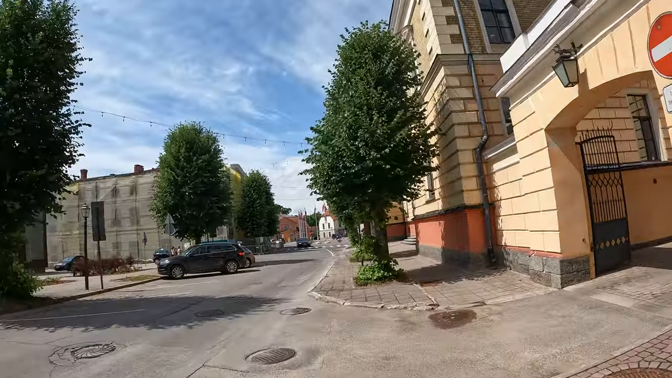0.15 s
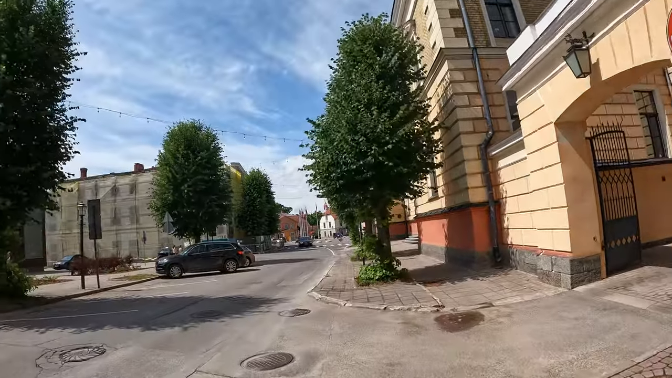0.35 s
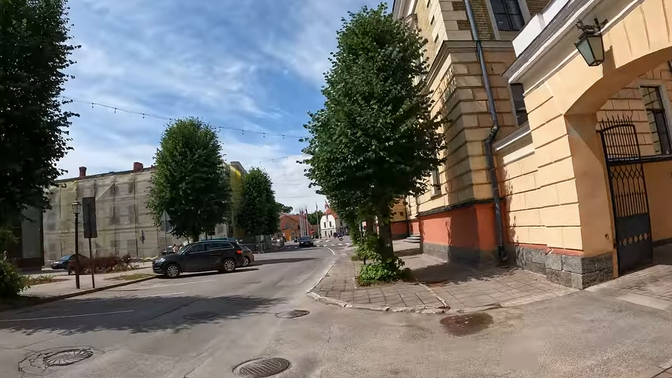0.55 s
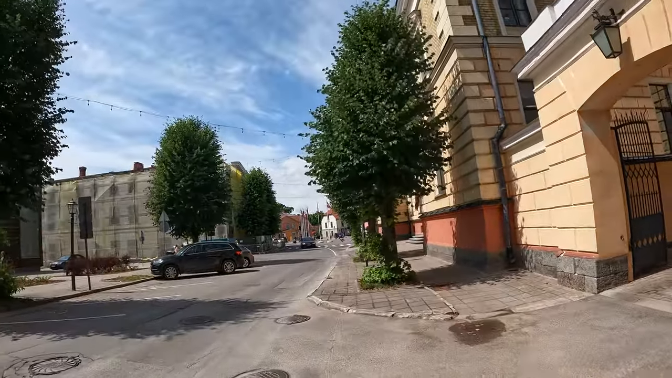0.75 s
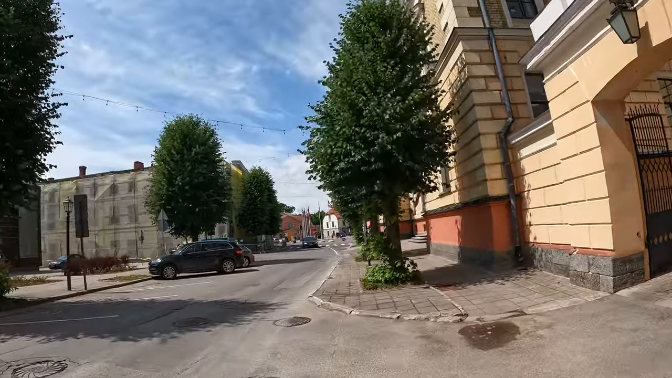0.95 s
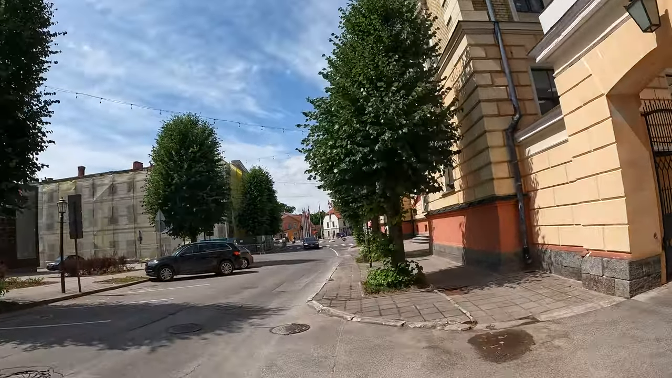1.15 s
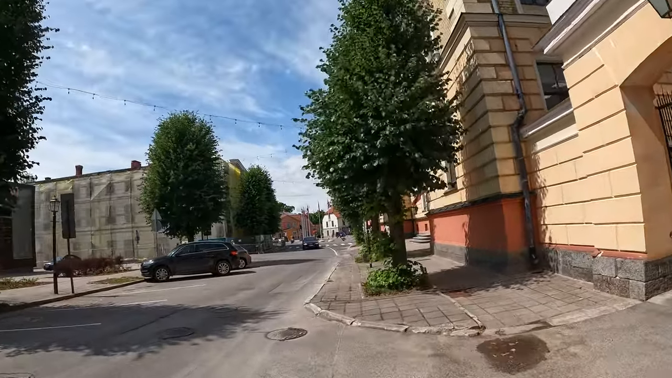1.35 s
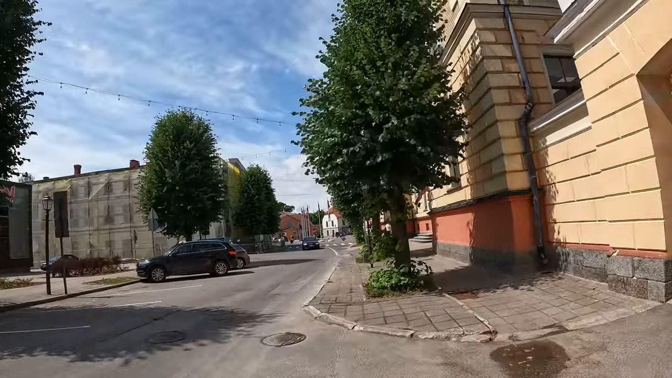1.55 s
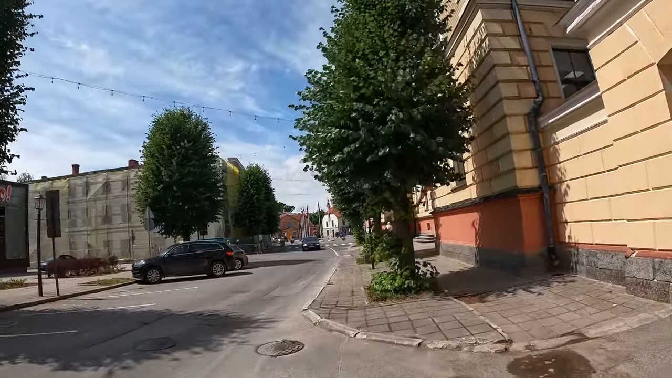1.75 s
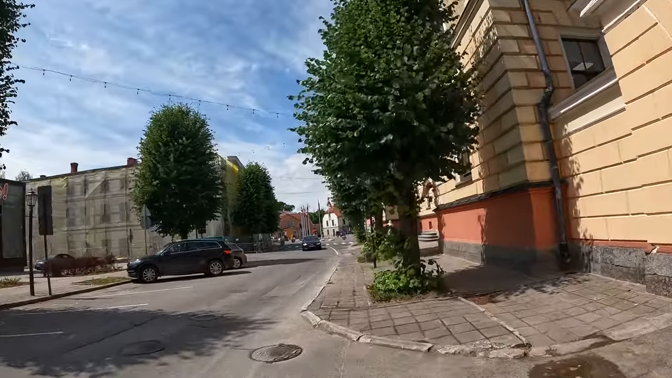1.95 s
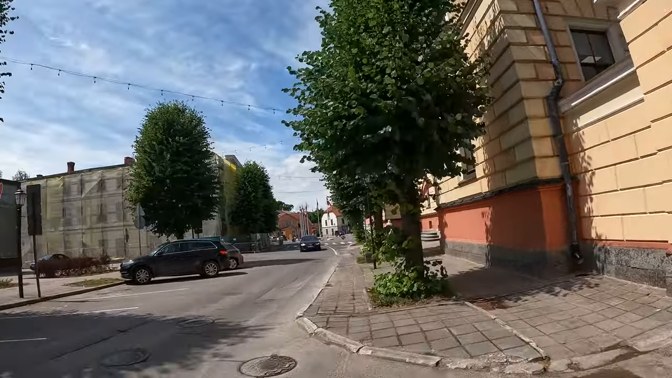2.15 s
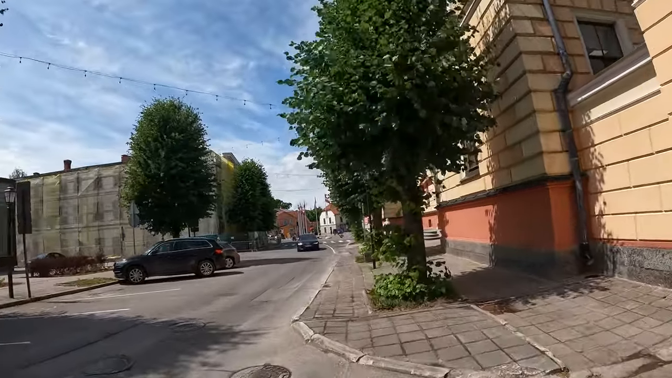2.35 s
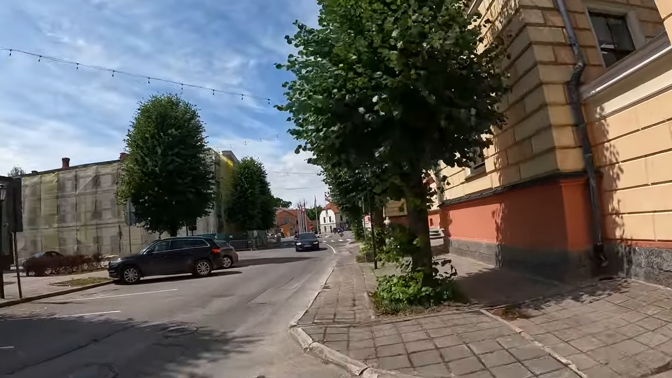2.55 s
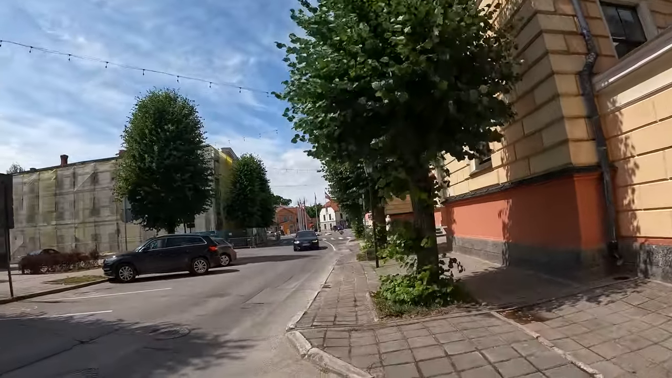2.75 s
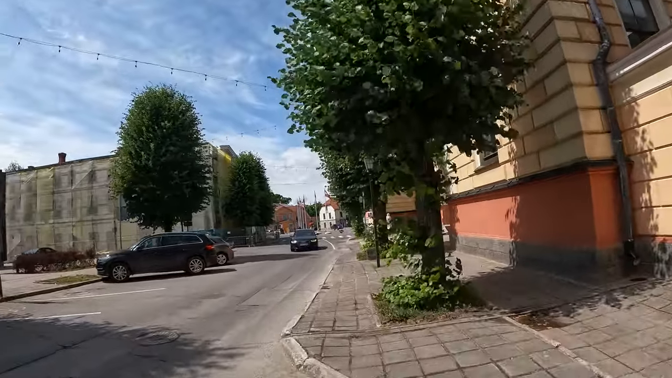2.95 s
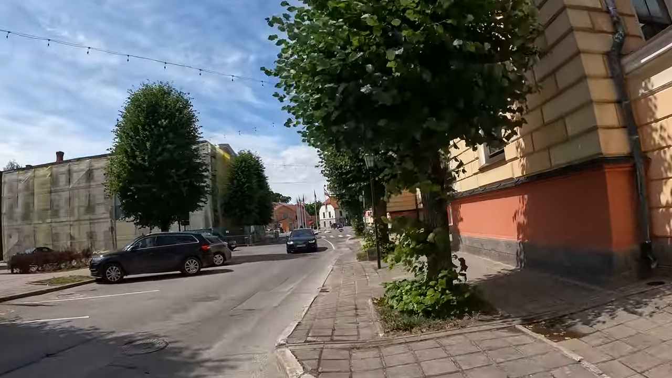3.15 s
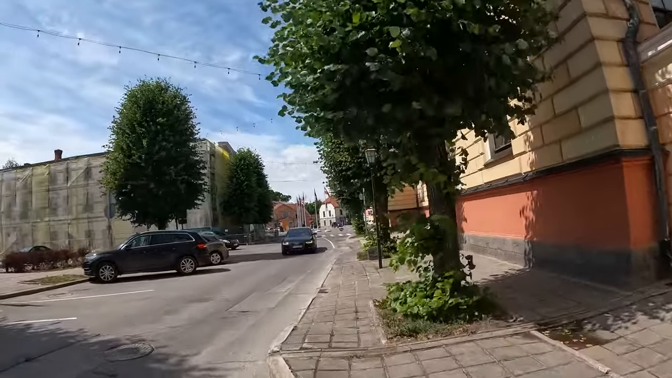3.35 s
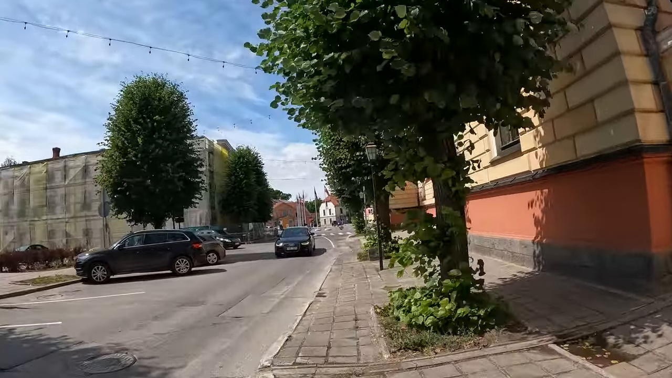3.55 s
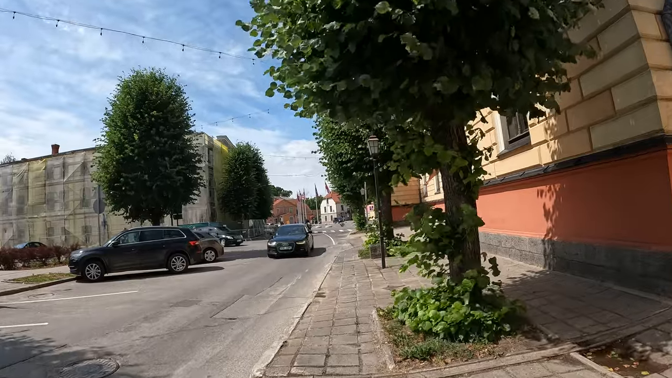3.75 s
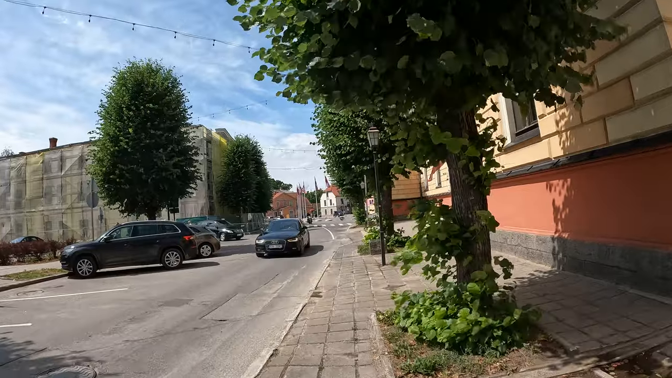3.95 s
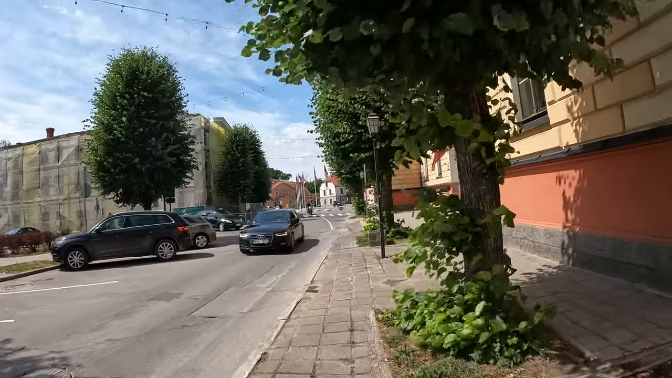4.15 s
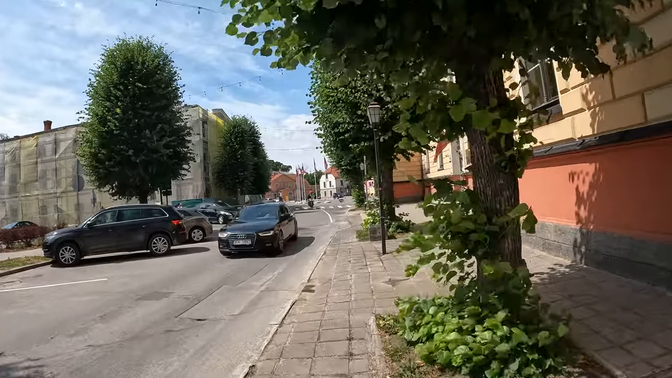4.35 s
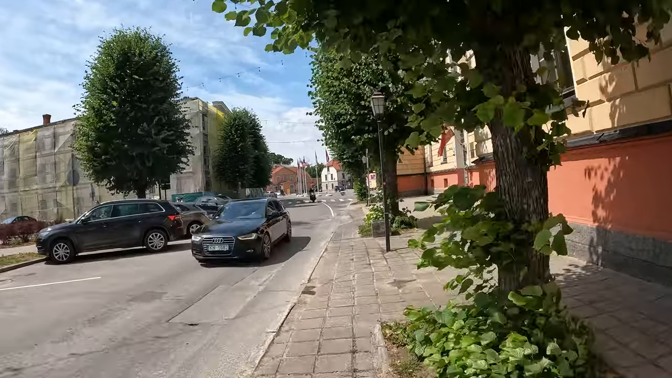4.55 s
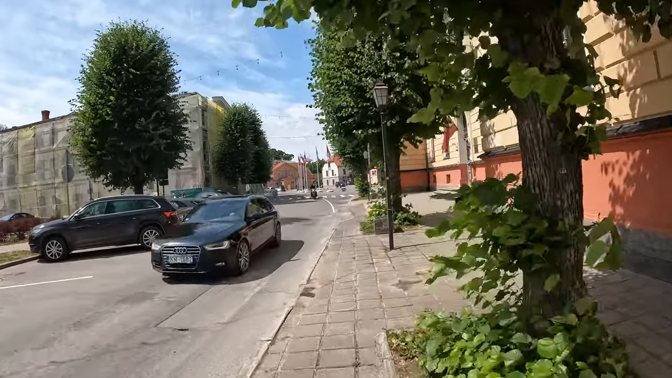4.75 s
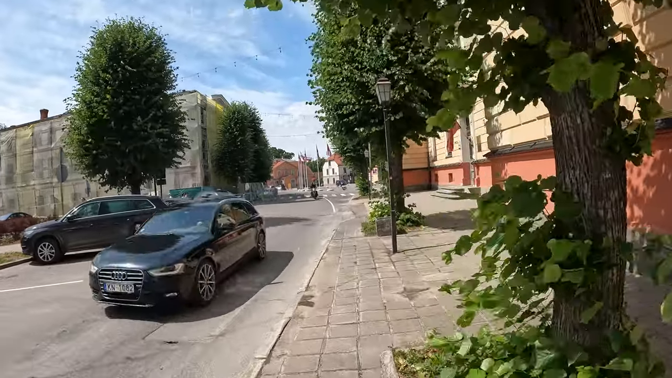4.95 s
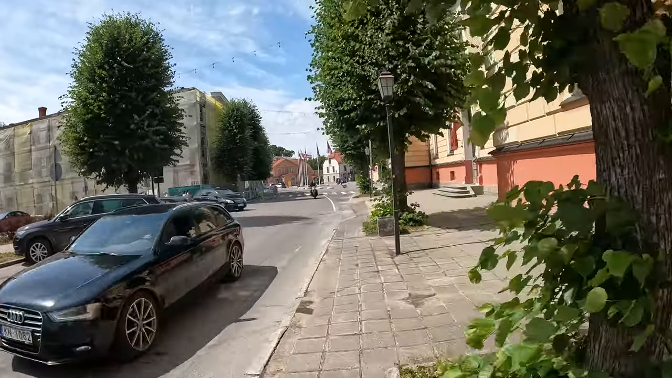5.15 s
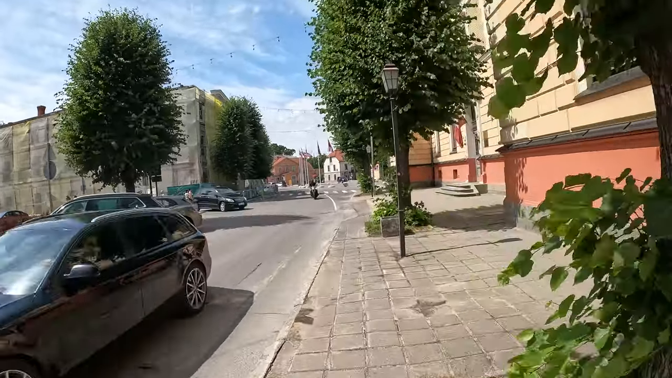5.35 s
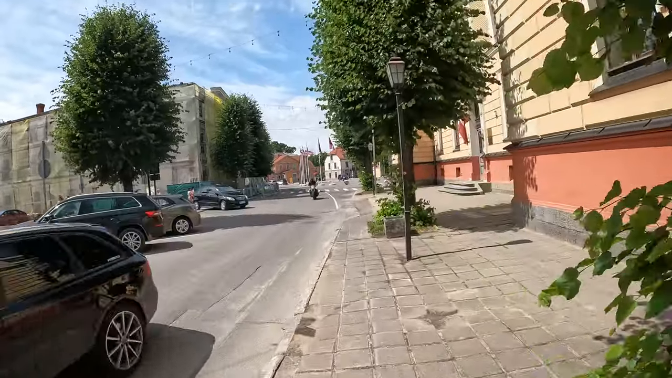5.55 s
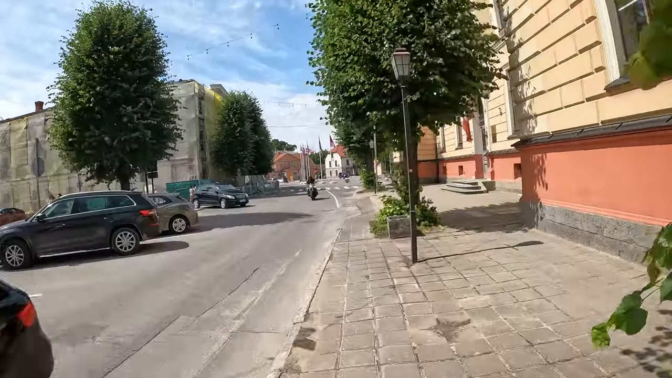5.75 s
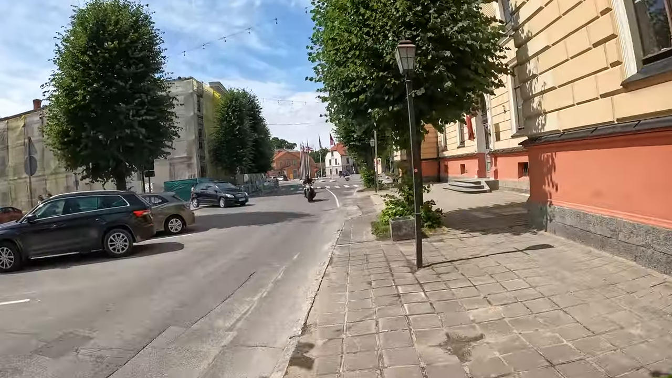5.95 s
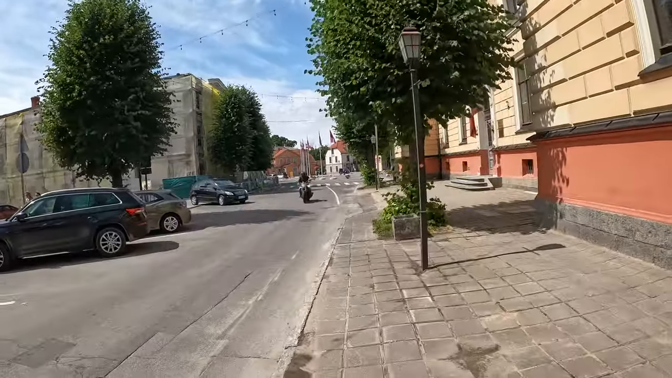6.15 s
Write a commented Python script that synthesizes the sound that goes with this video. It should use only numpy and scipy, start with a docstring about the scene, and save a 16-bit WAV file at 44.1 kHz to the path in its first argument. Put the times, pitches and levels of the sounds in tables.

```python
"""A motorcycle drones, eases off, accelerates and shifts up in a town street, while a car rolls up and past.
The motorcycle is a stack of exhaust harmonics and block growl locked to one engine, plus a gliding gear whirr.
The car is coloured tyre noise that swells to a roar as its distance shrinks, with a drive-train whine.
Wind lumps on the microphone as shaped noise and pressure slaps; shoes scuff gritty paving with noise bursts.
Dull knocks are short noisy resonances, and faint unsteady hums come from further down the street."""
import sys
import numpy as np
from scipy import signal
from scipy.fft import rfft, irfft, next_fast_len
from scipy.io import wavfile

SR = 44100
rng = np.random.default_rng(int(sys.argv[2]) if len(sys.argv) > 2 else 0)


def persist_wave(psi):
    """Save psi, clipped to +-1, as 16-bit WAV."""
    counts = np.round(np.clip(psi, -1, 1) * 32767).astype(np.int16)
    wavfile.write(sys.argv[1], SR, np.atleast_2d(counts).T)


N = 273856
TIME = np.arange(N) / SR   # s

# Motorcycle pulling, easing off, accelerating and shifting up. Each row: time in seconds, engine cycles per second.
ENGINE_SPEED = [(0,30.4),(.45,30.4),(.7,32.1),(1.1,33.2),(1.35,33.2),(1.93,31.5),(2.45,29.5),(3.17,28.3),(3.68,31.3),(4.45,34.5),(4.98,38.3),(5.2,41.9),(5.32,41.5),(5.47,35.6),(5.62,38.1),(5.73,38.5),(6.21,34.4)]
# Exhaust loudness as the throttle opens and closes. Each row: time in seconds, level in dB.
THROTTLE_LEVEL = [(0,-36.5),(.17,-33),(.5,-34),(.75,-32),(1.08,-28.5),(1.3,-31),(1.65,-34.5),(1.92,-30),(2.9,-26),(3.17,-46),(3.45,-23.5),(3.75,-32.5),(4.45,-21),(4.75,-30),(4.97,-23),(5.3,-27.5),(5.75,-29),(6.05,-22)]
# Main exhaust harmonics. Each row: multiple of the cycle rate, dB on the throttle level before the car
# has gone by, the same after.
MAIN_HARMONICS = [(3, -14.5, 2), (4, -5.5, 1), (5, -1.5, -4)]
# Weaker exhaust harmonics. Each row: multiple of the cycle rate, dB against the main ones together.
WEAK_HARMONICS = [(1,-16.5),(2,-20),(6,-25.5),(7,-24.5),(8,-25.5)]
# Echoes between house fronts briefly cancel or lift one harmonic. Each row: multiple of the cycle rate,
# time in seconds, change in dB, width in seconds.
ECHO_FADES = [(1,5.87,8.5,0.28),(3,.2,10,0.18),(3,1.937,18.5,0.12),(3,3.4,4,0.26),(3,4.65,-5,0.22),(3,5.6,8,0.059),(4,5.62,0,.07),(4,0.19,5.5,0.039),(4,0.76,-6.5,0.28),(4,1.9,-13,0.041),(4,3.59,-10,0.11),(4,5.05,-15,.1),(4,4.78,8,0.05),(4,5.88,-10,0.049),(5,0.49,-16,0.056),(5,0.79,2,.2),(5,1.5,-5,0.17),(5,1.925,5,0.052),(5,2.8,7.5,0.037),(5,5.34,5,0.046),(5,7.8,5,0.044)]
# Growl of the engine block. Each row: multiple of the cycle rate, relative dB before the car has gone by,
# relative dB after.
GROWL_HARMONICS = [(8,0,-9),(9,-3,1.5),(10,-9,0.5),(11,-11,-3.5),(12,-4.5,-4.5),(13,-4.5,-3.5),(14,-7,-8),(15,-8,0),(16,0,-6),(17,-1.5,-12),(18,-6.5,-5.5),(19,-8.5,-6),(21,-3.5,-9),(23,-4,-5.5),(25,-3,-6),(27,-10,-3)]
# Growl swelling as the engine is revved. Each row: time in seconds, level in dB.
GROWL_LEVEL = [(0,-59.5),(3.4,-55),(4.35,-49),(4.95,-41),(5.25,-43.5),(5.5,-49),(6.21,-48)]
# Gear whirr, before the split into core and band. Each row: time in seconds, level in dB.
WHIRR_LEVEL = [(0,-78),(1.3,-65),(3.05,-63.5),(3.35,-54),(3.65,-50),(4.3,-49.5),(4.75,-54),(5.03,-47.5),(5.28,-48),(5.38,-53),(5.48,-51),(5.65,-48.5),(6.21,-51)]
BOOM_HZ, BOOM_WIDTH_HZ, BOOM_DB = 120.2, 7.2, 8.5   # a main harmonic booms as it crosses this resonance
JITTER_CYCLES, JITTER_HZ = 0.003, 10   # uneven firings: their spread, and how fast it wanders

# Far tyre noise filling the street, before each band's offset. Each row: time in seconds, level in dB.
FAR_TYRES_LEVEL = [(0,-41),(.25,-46.5),(1,-44),(1.4,-38.5),(1.95,-37),(2.75,-40),(6.21,-41.5)]
# Singing band of the tyres. Each row: time in seconds, level in dB.
SINGING_LEVEL = [(0,-56.5),(1.5,-49),(2.3,-41.5),(3.6,-46.5),(3.9,-46.5),(4.45,-36),(4.85,-39),(6.21,-44)]
# Colours of the far bass, then of the passing car's body rumble, tread roar, tread hiss and close-range sizzle.
# Each row: frequency in Hz, relative dB per Hz.
FAR_RUMBLE_SPECTRUM = [(40,-3.5),(90,1),(150,7.5),(210,1),(270,-3.5),(380,-10),(540,-14.5),(750,-17),(1500,-48.5)]
RUMBLE_SPECTRUM = [(40, -3), (90, 4), (150, 5), (215, 7), (270, -3.5), (380, -6.5), (520, -11.5),
                   (750, -17), (1500, -49.5)]
ROAR_SPECTRUM = [(250, -25.5), (480, -5.5), (630, 1.5), (780, 0), (980, 2), (1170, -2.5), (1600, -5.5),
                 (2200, -17.5), (3200, -28.5), (7000, -56), (9000, -75)]
HISS_SPECTRUM = [(900, -18.5), (1850, 4), (2250, 0.5), (2650, 1), (3600, -3.5), (5000, -8.5), (6300, -13.5),
                 (7250, -16.5), (8000, -30), (8900, -33), (9700, -29.5), (10700, -33), (11600, -41),
                 (15500, -59.5)]
SIZZLE_SPECTRUM = [(5000, -14.5), (8500, -2.5), (10000, 6.5), (11500, 0), (12700, 3), (14000, -8.5),
                   (15700, -15.5)]
# How each noise of the car passes. Each row: dB when level with the listener, dB lost per tenfold distance,
# dB change once gone by. The whine's first value is a reference for its tones.
RUMBLE_PASS = (-22.5, 13.6, -5)
ROAR_PASS = (-31, 7.9, -6)
HISS_PASS = (-38.5, 9.3, -4.5)
SIZZLE_PASS = (-71, 19, 0)
WHINE_PASS = (-36.5, 28, -13.5)
# Drive-train whine. Each row: frequency in Hz at rest, dB on the whine's reference, width in Hz.
WHINE_TONES = [(1600,-2.5,150)]
# Slow extra rise of tyre hiss; its peak lies beyond the end.
# The row: peak time in seconds, peak level in dB, rise in seconds, decay in seconds.
RISING_HISS = (8.5, -41.5, 1.9, 0.27)
PASS_S, CAR_M_PER_S, CAR_SIDE_M = 5.355, 8.4, 2.8   # the car draws level, this far to the side
EMERGE_S, EMERGE_TAKES_S, SCREENED_DB = 3.26, 0.071, -10   # until then trees and parked cars screen it
GONE_S, GONE_TAKES_S = 5.33, 0.027   # its front swings past
# the singing band sinks as the car nears
NOTE_FAR_HZ, NOTE_NEAR_HZ, NOTE_SINKS_S, NOTE_TAKES_S = 817.4, 585, 4.62, 0.16
SOUND_M_PER_S = 343

# Gusts. Each row: peak time in seconds, level in dB, decay in seconds.
GUSTS = [(1.091,-20,0.17),(1.3,-22.5,0.12),(1.631,-20.5,0.17),(1.82,-24,0.11),(2.16,-19,0.062),(2.38,-21.5,0.093),(2.5,-19,0.16),(2.68,-26.5,0.21),(3.1,-21,0.09),(3.27,-20.5,0.1),(3.52,-30,0.14),(3.729,-21,0.16),(4.05,-28,0.097),(4.42,-22,0.092),(5,-26,0.061),(5.27,-20.5,0.069),(6.1,-33,0.17)]
# Sharp gusts and the car's bow wave. Each row: peak time in seconds, level in dB, rise in seconds,
# decay in seconds.
BUFFETS = [(1.091,-24.5,0.028,0.026),(1.235,-20,0.021,0.027),(1.311,-23,.015,0.22),(1.59,-26.5,0.0088,0.029),(2.15,-28.5,0.021,0.041),(2.39,-25.5,0.01,0.046),(3.075,-24.5,0.018,0.047),(3.29,-28,0.025,0.054),(5.28,-17.5,0.031,0.048)]
# Single eddies slapping and thumping the microphone. Each row: time in seconds, peak in dB, frequency in Hz.
SLAPS = [(1.113,-16,105),(1.228,-14.5,150),(1.247,-17,246),(1.272,-20,260),(1.308,-14,45),(1.336,-24,240),(1.371,-21.5,190),(2.386,-14,41.7),(2.43,-18.5,191),(3.038,-19,28),(3.088,-19,38),(3.251,-15,29.7),(3.316,-16,48)]
# Colours of wind and of buffets. Each row: frequency in Hz, relative dB per Hz.
WIND_SPECTRUM = [(8,5.5),(20,-0.5),(35,-1),(65,-3.5),(100,-7),(160,-16.5),(300,-24),(700,-58.5),(2000,-73)]
BUFFET_SPECTRUM = [(20, -7), (60, 3), (120, 6.5), (330, -9), (520, -17), (900, -33), (3000, -63.5)]
BREEZE_DB, GUST_RISE_SHARE = -31.5, 0.77   # steady wind; a gust's rise against its decay

# Shoe scuffs, then crunching and snapping sand grains, both before the grain flicker.
# Each row: peak time in seconds, level in dB, rise in seconds, decay in seconds.
SCUFFS = [(0.027,-38,0.017,0.039),(1.662,-42.5,0.014,0.042),(1.97,-48,.047,0.055),(2.135,-45.5,0.031,0.043),(3.95,-43.5,0.026,0.047),(5.697,-42,.004,0.021),(5.733,-40.5,0.015,0.067)]
GRIT = [(.03, -60, 0.013, 0.02), (.987, -64, 0.0015, 0.003), (4.805, -64, 0.002, .01),
        (5.233, -60, .001, .002), (5.738, -63, 0.02, 0.025)]
# Colour of a scuff. Each row: frequency in Hz, relative dB per Hz.
SCUFF_SPECTRUM = [(300, -22), (750, 0), (1400, 3), (3500, 3.5), (5500, -3), (7100, -9.5), (8200, -23.5),
                  (10000, -30), (11500, -37.5)]
# Dull knocks of heels and wheels on uneven ground. Each row: peak time in seconds, level in dB,
# rise in seconds, decay in seconds, frequency in Hz, width in Hz.
THUDS = [(0.027,-28.5,0.0036,0.0065,734,210),(5.26,-27,0.046,0.027,547,170),(5.694,-27.5,.002,0.011,1300,1000),(5.712,-30,.002,0.019,1250,1000),(5.789,-22,.0015,.009,664.5,320),(5.797,-28.5,0.0022,.005,720,300)]
# Hum from further down the street. Each row: peak time in seconds, level in dB, rise in seconds,
# decay in seconds, frequency in Hz.
HUMS = [(0.381,-42,0.14,0.12,250.5),(1.95,-41.5,0.28,0.054,273.4)]


def from_db(db):
    """Turn decibels into an amplitude factor."""
    return 10 ** (np.asarray(db) / 20)


def rms_one(x):
    """Scale a signal to rms 1."""
    return x / np.sqrt(np.mean(x ** 2) + 1e-20)


def in_time(rows):
    """Read a two-column curve at every sample."""
    seconds, values = np.transpose(rows)
    return np.interp(TIME, seconds, values)


def drift(rate_hz):
    """Smooth random wandering: low-passed noise, rms 1."""
    size = next_fast_len(N, True)
    hz = np.fft.rfftfreq(size, 1 / SR)
    low_pass = 1 / (1 + (hz / rate_hz) ** 2) ** 2
    return rms_one(irfft(rfft(rng.standard_normal(size)) * low_pass, size)[:N])


def noise(spectrum):
    """Noise with the given colour, falling away beyond its ends; rms 1."""
    hz = np.maximum(np.fft.rfftfreq(N, 1 / SR), 1)
    points, db = np.transpose(spectrum)
    ends = np.minimum(hz / points[0], 1) * np.minimum(points[-1] / hz, 1)
    gain = from_db(np.interp(np.log(hz), np.log(points), db)) * ends ** 2
    return rms_one(irfft(rfft(rng.standard_normal(N)) * gain, N))


def narrow_noise(hz, width_hz):
    """A noisy resonance about a fixed or moving pitch; rms 1."""
    phase = 2 * np.pi * np.cumsum(hz * np.ones(N)) / SR
    return rms_one(drift(width_hz) * np.cos(phase) + drift(width_hz) * np.sin(phase))


def swell(s, db, rise, decay):
    """Envelope with a bell-shaped climb to its peak and an exponential fall."""
    before = np.minimum(TIME - s, 0)
    after = np.maximum(TIME - s, 0)
    return from_db(db) * np.exp(-(before / rise) ** 2 / 2 - after / decay)


def turning(s, takes):
    """A smooth change from 0 to 1 about a moment."""
    return 0.5 + 0.5 * np.tanh((TIME - s) / takes / 2)


def passing(level_db, fall_db, gone_db):
    """Gain of a car noise: it emerges, grows as the distance shrinks, and changes once gone by."""
    distance = np.hypot(CAR_SIDE_M, CAR_M_PER_S * (TIME - PASS_S))
    distance_db = -fall_db * np.log10(distance / CAR_SIDE_M)
    screened_db = SCREENED_DB * (1 - turning(EMERGE_S, EMERGE_TAKES_S))
    behind_db = gone_db * turning(GONE_S, GONE_TAKES_S)
    return from_db(level_db + distance_db + screened_db + behind_db)


def motorcycle(main_waver_db=1.1, fading_db=2.5):
    """Exhaust harmonics boom between house fronts over a block growl, all locked to the engine's turning."""
    speed = in_time(ENGINE_SPEED)
    throttle_db = in_time(THROTTLE_LEVEL)
    turn = 2 * np.pi * (np.cumsum(speed) / SR + JITTER_CYCLES * drift(JITTER_HZ))
    clear = turning(GONE_S, GONE_TAKES_S)

    def harmonic(order, wander_db):
        """One engine line; reflections make it fade in and out on its own."""
        fading = from_db(wander_db * drift(5.4))
        return np.sqrt(2) * fading * np.sin(order * turn + rng.uniform(0, 2 * np.pi))

    def strength(order, before_db, after_db):
        """Gain of a main harmonic: throttle, the way past the car, and the resonance."""
        resonance_db = BOOM_DB * np.exp(-((order * speed - BOOM_HZ) / BOOM_WIDTH_HZ) ** 2 / 2)
        return from_db(throttle_db + before_db + (after_db - before_db) * clear + resonance_db)

    def echoes(order):
        """Gain of an exhaust harmonic as the street's echoes cancel or lift it."""
        change_db = np.zeros(N)
        for faded_order, s, db, width in ECHO_FADES:
            if faded_order == order:
                change_db += db * np.exp(-((TIME - s) / width) ** 2 / 2)
        return from_db(change_db)

    gains = np.array([strength(*row) for row in MAIN_HARMONICS])
    boom = sum(gain * echoes(row[0]) * harmonic(row[0], main_waver_db)
               for row, gain in zip(MAIN_HARMONICS, gains))
    load = np.sqrt(np.sum(gains ** 2, axis=0))   # the main harmonics together
    overtones = sum(from_db(db) * echoes(order) * harmonic(order, fading_db) for order, db in WEAK_HARMONICS)
    growl = sum(from_db(before + (after - before) * clear) * harmonic(order, fading_db)
                for order, before, after in GROWL_HARMONICS)
    return boom + load * overtones + from_db(in_time(GROWL_LEVEL)) * growl


def gears(whines_per_cycle=97.0, lead_s=0.025, band_width_hz=300, band_db=-1.5, core_db=-7, shake=0.017):
    """A gliding whine inside a soft whirr; it follows the engine a little ahead of the echoing exhaust."""
    hz = whines_per_cycle * np.interp(TIME + lead_s, TIME, in_time(ENGINE_SPEED))
    shaken_hz = hz * (1 + shake * drift(120))
    core = np.sqrt(2) * np.sin(2 * np.pi * np.cumsum(shaken_hz) / SR)
    band = narrow_noise(hz, band_width_hz)
    return from_db(in_time(WHIRR_LEVEL)) * (from_db(core_db) * core + from_db(band_db) * band)


def car(far_rumble_db=7.0, rumble_follows=0.69, far_roar_db=-0.5, far_hiss_db=-10.0, far_sizzle_db=-85,
        grain_db=0.28, note_width_hz=125, note_waver_db=1.5):
    """Tyres on coarse asphalt, far and passing: body rumble, roar with a singing band, hiss, close sizzle."""
    far_db = in_time(FAR_TYRES_LEVEL)
    # bass bends round corners and swings less
    far_bass_db = far_db.mean() + rumble_follows * (far_db - far_db.mean()) + far_rumble_db
    far_rumble = from_db(far_bass_db) * noise(FAR_RUMBLE_SPECTRUM)
    near_rumble = passing(*RUMBLE_PASS) * noise(RUMBLE_SPECTRUM)

    # far and near noise add in power
    roar_gain = np.hypot(from_db(far_db + far_roar_db), passing(*ROAR_PASS))
    near_hiss_gain = np.hypot(passing(*HISS_PASS), swell(*RISING_HISS))
    hiss_gain = np.hypot(from_db(far_db + far_hiss_db), near_hiss_gain)
    tread = roar_gain * noise(ROAR_SPECTRUM) + hiss_gain * noise(HISS_SPECTRUM)

    note_hz = NOTE_FAR_HZ + (NOTE_NEAR_HZ - NOTE_FAR_HZ) * turning(NOTE_SINKS_S, NOTE_TAKES_S)
    note_gain = from_db(in_time(SINGING_LEVEL) + note_waver_db * drift(29))
    note = note_gain * narrow_noise(note_hz, note_width_hz)
    sizzle_gain = np.hypot(from_db(far_sizzle_db), passing(*SIZZLE_PASS))
    sizzle = sizzle_gain * noise(SIZZLE_SPECTRUM)
    asphalt = from_db(grain_db * drift(51))   # the road's grain shakes all tread noise together
    return far_rumble + near_rumble + asphalt * (tread + note + sizzle)


def drive_train(waver_db=3.5):
    """A wavering whine stands out at close range; Doppler shift sinks it as the car draws level."""
    along_m = CAR_M_PER_S * (TIME - PASS_S)
    doppler = 1 - CAR_M_PER_S / SOUND_M_PER_S * along_m / np.hypot(CAR_SIDE_M, along_m)
    tones = sum(from_db(db + waver_db * drift(6.8)) * narrow_noise(hz * doppler, width)
                for hz, db, width in WHINE_TONES)
    return passing(*WHINE_PASS) * tones


def slap(s, db, hz):
    """One pull and push of air pressure."""
    angle = 2 * np.pi * hz * (TIME - s)
    return from_db(db) * angle * np.exp((1 - angle ** 2) / 2)


def wind():
    """Gusts rumble over a steady breeze; sharp buffets reach higher, slaps run from deep thumps to pops."""
    # gusts and breeze add in power
    gust_power = sum(swell(s, db, GUST_RISE_SHARE * decay, decay) ** 2 for s, db, decay in GUSTS)
    eddies = np.sqrt(from_db(BREEZE_DB) ** 2 + gust_power) * noise(WIND_SPECTRUM)
    buffets = sum(swell(*row) for row in BUFFETS) * noise(BUFFET_SPECTRUM)
    slaps = sum(slap(*row) for row in SLAPS)
    return eddies + buffets + slaps


def shoes(grain_db=2.5, grit_hz=11000, grit_width_hz=3500):
    """Soles drag over sandy paving and crush single grains, all flickering with the grain."""
    scuffs = sum(swell(*row) for row in SCUFFS) * noise(SCUFF_SPECTRUM)
    grit = sum(swell(*row) for row in GRIT) * narrow_noise(grit_hz, grit_width_hz)
    return from_db(grain_db * drift(300)) * (scuffs + grit)


def thuds():
    """Each knock is a brief noisy band, like one heavily damped resonance being shaken."""
    return sum(swell(s, db, rise, decay) * narrow_noise(hz, width)
               for s, db, rise, decay, hz, width in THUDS)


def hums(waver=0.0057):
    """Faint sine tones whose pitch is slightly unsteady."""
    total = np.zeros(N)
    for s, db, rise, decay, hz in HUMS:
        phase = 2 * np.pi * np.cumsum(hz * (1 + waver * drift(7.3))) / SR
        total += swell(s, db, rise, decay) * np.sqrt(2) * np.sin(phase)
    return total


def scene():
    """Everything meets at one microphone."""
    vehicles = motorcycle() + gears() + car() + drive_train()
    return (vehicles + wind() + shoes() + thuds() + hums())[None]


def record(dry, cutoff_hz=15700):
    """A steep low-pass cuts the top."""
    return signal.sosfilt(signal.butter(24, cutoff_hz, fs=SR, output="sos"), dry)


dry = scene()
out = record(dry)
persist_wave(out)
```